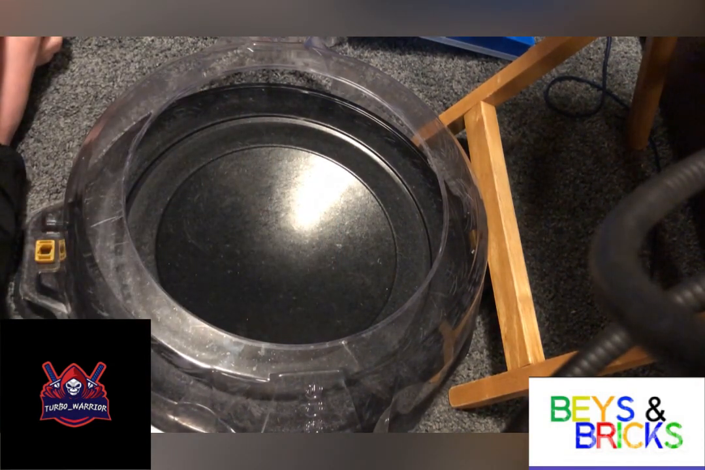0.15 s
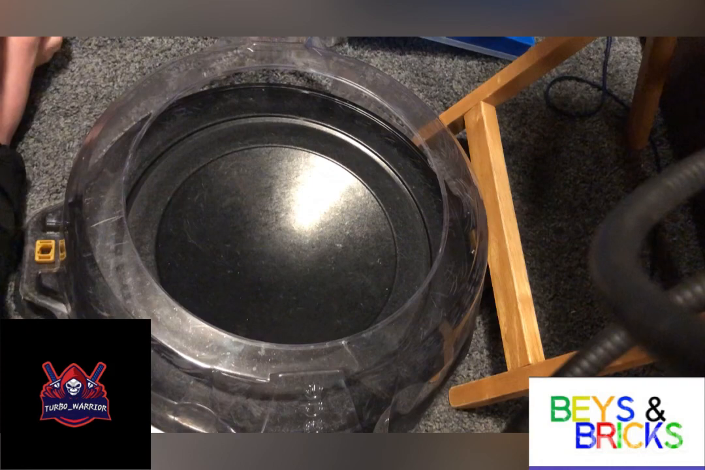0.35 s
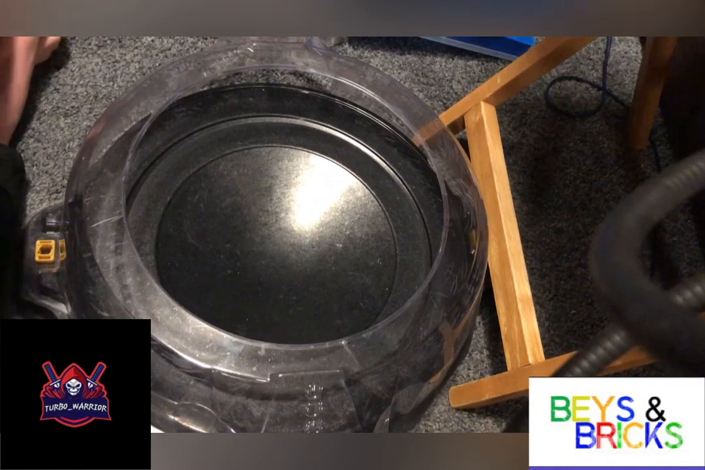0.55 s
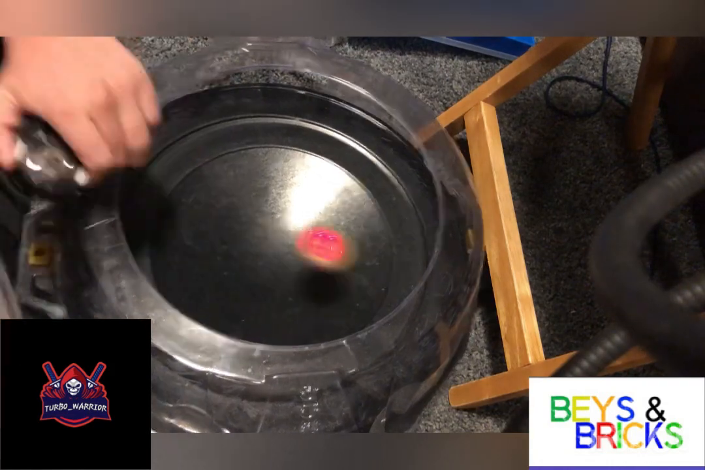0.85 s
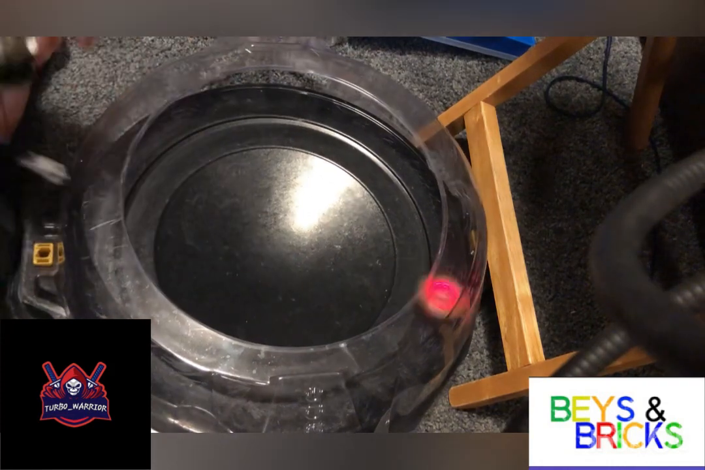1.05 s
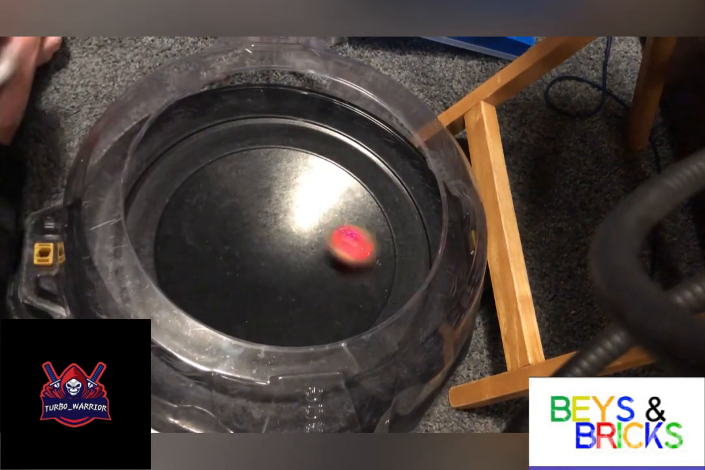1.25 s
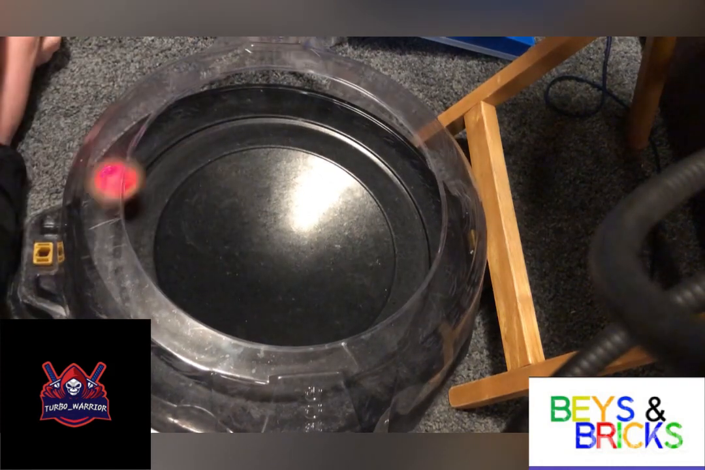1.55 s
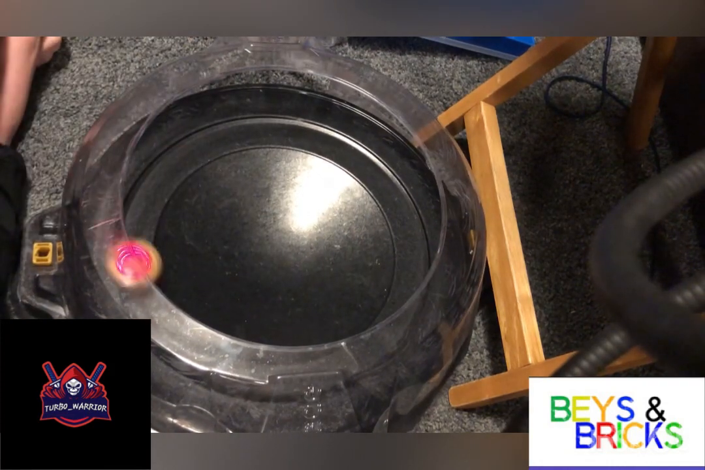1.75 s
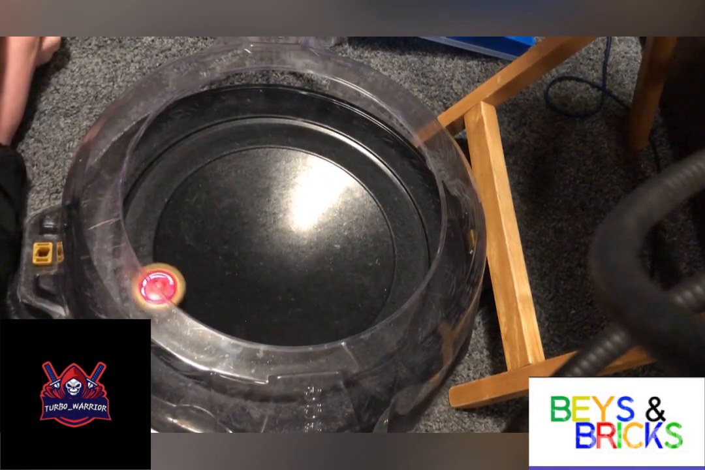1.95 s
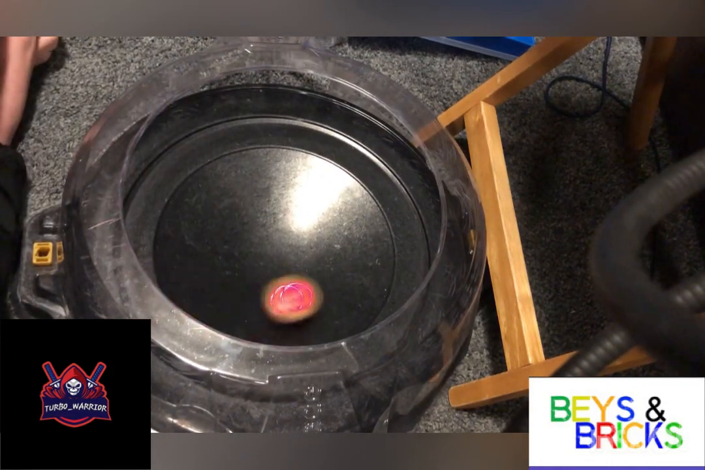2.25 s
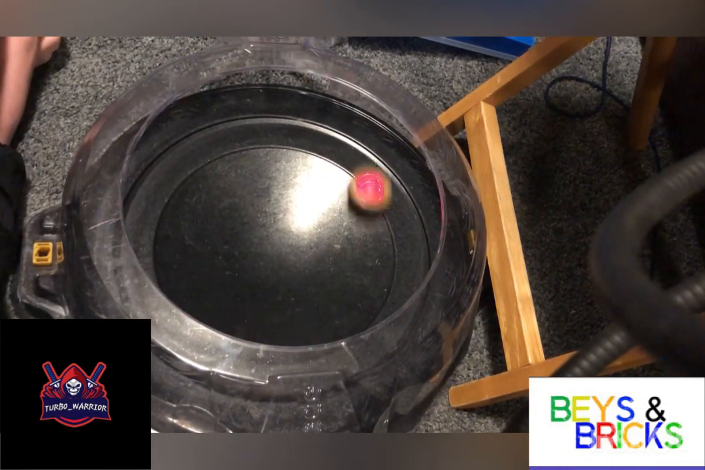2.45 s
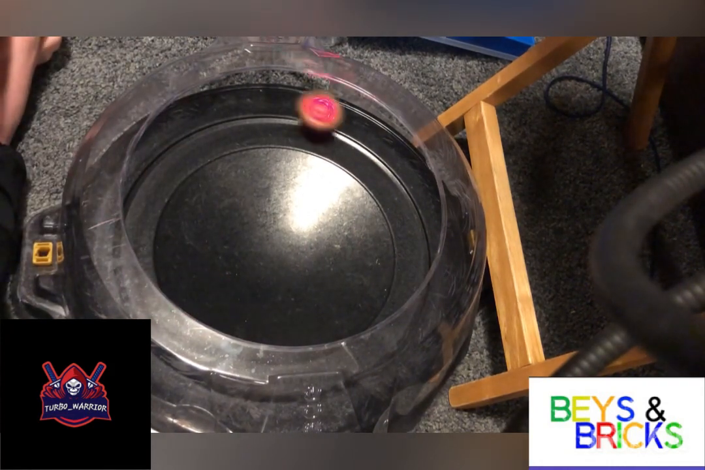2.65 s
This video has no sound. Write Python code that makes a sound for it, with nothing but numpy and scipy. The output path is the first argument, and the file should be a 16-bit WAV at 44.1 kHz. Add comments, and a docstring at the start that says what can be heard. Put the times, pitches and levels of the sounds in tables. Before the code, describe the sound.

A spinning top is launched into a plastic arena, close by in a small carpeted room. After faint handling clicks, the launcher squeaks and whirs from about 0.6 to 1 second. The top lands with a hard clack at 0.8 and strikes the wall loudly near 1.1 and 1.6 seconds. It circles with a quieter rumble, scrape, hum and rattle, knocking lightly around 2 and 2.6 seconds.

```python
"""A small carpeted room: a spinning top is ripped from a hand launcher into a plastic stadium, close by.
The launcher clicks, its gears whir with the cord, and stick-slip squeaks as the pull starts.
The top lands, bounces and knocks the wall, sending bending waves through the thin shell.
Its rim clacks, its tip rumbles and scrapes, imbalance hums at the spin rate and loose parts rattle.
The wall drones where the top rubs along it. The hardest blows clip."""
import sys
import numpy as np
from scipy import signal
from scipy.fft import rfft, irfft
from scipy.io import wavfile

SR = 44100
rng = np.random.default_rng(int(sys.argv[2]) if len(sys.argv) > 2 else 0)


def wrap_up_sound(samples):
    """Save the sound to the file named by the first command line argument, as 16-bit audio."""
    columns = np.atleast_2d(samples).T
    # keep every value between -1 and 1, then stretch to whole-number steps
    tamed = np.clip(columns, -1, 1)
    steps = np.round(tamed * 32767).astype(np.int16)
    wavfile.write(sys.argv[1], SR, steps)


N = 123479
TIME_S = np.arange(N) / SR

# room air: f/Hz, level/dB
AIR_SPECTRUM = [(15, -54.5), (25, -31.5), (123, -10), (200, -18.5), (775, -25), (16000, -41.5)]
# launcher handling clicks: t/s, level/dB
HANDLING_CLICKS = [(0.014, -37), (0.0224, -22), (0.071, -40.5), (0.105, -43), (.1235, -42.5), (0.5, -40.5),
                   (0.539, -39.5), (0.5708, -33), (0.61, -18), (.630, -15), (.736, -8.5)]
# launcher click: f/Hz, level/dB
LAUNCHER_SPECTRUM = [(100, -30), (500, -22.5), (1200, -7), (2200, -5), (4000, -1), (7000, -9.5),
                     (16000, -16.5)]
# launcher resonances: f/Hz, lift/dB
HOUSING_PEAKS = [(2050, 5), (3030, 5.5), (3560, 6)]
# cord pull and rewind: t/s, tooth rate/Hz, chatter level/dB
CORD_PULL = [(.555, 303.1, -52), (.604, 446.5, -33.5), (.622, 718.2, -19), (.638, 1079, -14),
             (.657, 1618, -10), (.668, 1875, -12.5), (.678, 1843, -7.5), (.692, 1407, -5),
             (.710, 1227, -7.5), (.720, 1137, -13), (.738, 1183, -5), (.746, 1162, -21.5),
             (.882, 1710, -31), (.898, 1840, -15), (.93, 1783, -20.5), (.965, 1468, -50)]
# gears: f/Hz, level/dB
GEAR_SPECTRUM = [(120, -59.5), (200, -33), (601, -15.5), (950, -6), (1700, -13.5), (2510, -2.5),
                 (3620, 2.5), (9930, -1), (16000, -5.5)]
# gear whine: multiple of tooth rate, level/dB
WHINE_HARMONICS = [(1, 1), (2, 1.5), (3, -5.5), (4, -12.5)]
# whine, strongest while the cord speeds the gears up: t/s, level/dB re chatter
WHINE_BALANCE = [(.67, -6.5), (.68, -12.5)]
# squeak: t/s, f/Hz, level/dB
SQUEAK_GLIDE = [(.593, 8690, -44), (.596, 8670, -14.5), (.602, 9410, -5), (.6045, 9610, -13.5),
                (.609, 9970, -8.5), (.613, 9940, 3.5), (.6165, 10100, -36)]

# rim clacks: t/s, level/dB, ring f/Hz
RIM_CLACKS = [(0.7777, -7.5, 6200), (1.019, -23.5, 5200), (1.170, -8.5, 5360), (1.299, -13.5, 3400),
              (1.303, -20, 2630), (1.9609, -22, 4000), (2.0533, -36.5, 3500), (2.1035, -28, 3940),
              (2.536, -26, 6900), (2.65, -28.5, 6650)]
# hard rim: f/Hz, level/dB
RIM_SPECTRUM = [(100, -51.5), (400, -15), (1200, -1.5), (3000, 0.5), (6000, -2.5), (9000, -3),
                (16000, -3.5)]
# blows on the stadium: t/s, thud/dB, knock/dB, crack/dB, struck spot f/Hz, body ring/dB
STADIUM_BLOWS = [(0.7778, 1.5, -16, -23, 271, -38), (.794, 0, -15.5, -17.5, 229, -40),
                 (0.973, -10, -18.5, -19, 314, -44), (1.055, -4, 0, -3.5, 1115, 0.5),
                 (1.139, -18.5, -37, -25, 365, -23), (1.177, -17, -37, -41, 346, -46),
                 (1.4734, -16, -28.5, -31, 558, -53), (1.523, -15.5, -12.5, -18, 598, -12.5),
                 (1.622, -22.5, -20.5, -23, 1060, -17), (1.6311, -12, -4, -4, 587, 6),
                 (1.651, -16, -10, -22.5, 571, -15), (2.499, -24.5, -26, -32.5, 577, -43),
                 (2.53, -23, -37, -32.5, 409, -50), (2.616, -21.5, -17, -17.5, 1213, -18.5)]
# centres of thud, knock, crack: f/Hz
BLOW_CENTRES_HZ = (287, 1470, 8000)
# dense shell modes: f/Hz, band level/dB
SHELL_SPECTRUM = [(30, -1), (70, -17.5), (140, -11), (290, -2), (550, 0), (1150, -1.5), (2200, -5.5),
                  (7000, -2), (16000, -2.5)]
# their early decay: f/Hz, t60/s
SHELL_DECAY = [(100, 0.044), (1000, 0.04), (10000, 0.034)]
# their tail: f/Hz, level/dB
SHELL_TAIL = [(100, -18.5), (1000, -14.5), (10000, -20)]
# main stadium modes: f/Hz, level/dB, t60/s
STADIUM_MODES = [(140, -8, .25), (231, -2, .22), (287, 0, .22), (314, -3, .22), (380, -5, .18),
                 (448, -6, .22), (580, -2, .22), (635, -6, .19), (786, -9, .17), (958, -10, .16),
                 (1114, -5, .17), (1556, -12, .13)]
# the top's body rings briefly at each blow: f/Hz, level/dB, t60/s
TOP_BODY_MODES = [(1927, -18.5, .06), (2063, -5.5, 0.028), (2191, -1, 0.028)]

# top running on the bowl: t/s, rumble/dB, scrape/dB, hum/dB
RUN_LEVELS = [(.79, -39, -29, -58), (.83, -19, -33, -36), (1.02, -49, -26, -41), (1.26, -33.5, -37.5, -62),
              (1.315, -32, -32.5, -28), (1.39, -32.5, -30.5, -29.5), (1.45, -29.5, -36.5, -32),
              (1.51, -57, -66, -45), (1.58, -51, -38, -52), (1.73, -25, -34, -38), (1.80, -39, -47, -41),
              (1.87, -53.5, -47.5, -53), (2.03, -43.5, -42, -63), (2.09, -32.5, -40.5, -37),
              (2.24, -39, -41, -41), (2.35, -38, -37, -32.5), (2.47, -32.5, -39, -34),
              (2.57, -40.5, -48, -41.5), (2.68, -30.5, -47, -48.5), (2.80, -52, -64, -45)]
# spin: t/s, rate/Hz
SPIN_RATE = [(.8, 97), (1.38, 93.5), (1.87, 83.4), (2.08, 83.5), (2.25, 85), (2.8, 80)]
# tip rumble: f/Hz, level/dB
RUMBLE_SPECTRUM = [(40, -46.5), (80, 7), (150, -4), (300, 5.5), (480, 3.5), (700, -4), (1150, -6.5),
                   (2200, -11.5), (4000, -123)]
# tip scrape: f/Hz, level/dB
SCRAPE_SPECTRUM = [(710, -29.5), (1200, -5.5), (1610, 0.5), (2450, -0.5), (5300, -3.5), (6870, -0.5),
                   (8000, -11.5), (12600, -10), (16000, -16)]
# resonances driven by the tip: f/Hz, lift/dB
TIP_PEAKS = [(1110, 0.5), (1570, 8), (4040, 9.5)]
# hum: multiple of spin rate, level/dB
HUM_ORDERS = [(1, 0), (1.5, 3.5), (2, 2.5), (2.5, -3), (3, -7), (4, -5.5), (5, -11), (6, -8.5), (7, -9),
              (13, -11)]
# lurch on every second turn: t/s, half-order gain/dB
LURCH = [(1.45, -3.5), (2.1, -12.5)]
# loose parts of the top: t/s, level/dB
RATTLE_CLICKS = [(1.331, -27.5), (1.352, -24), (1.3719, -21), (1.3948, -21.5), (1.425, -30.5),
                 (1.481, -27.5), (1.552, -29), (1.573, -31), (1.728, -30), (1.751, -31), (2.334, -31.5),
                 (2.346, -28), (2.357, -32), (2.37, -32), (2.3934, -28.5)]
# loose parts: f/Hz, level/dB
RATTLE_SPECTRUM = [(500, -8), (2500, -7), (5300, -14), (6900, 5), (8000, -6.5), (12000, -9), (16000, -14)]
# rides up the wall: closest contact t/s, length/s, level/dB, f/Hz
WALL_RIDES = [(1.715, 0.066, -31, 493), (2.069, 0.026, -29, 467), (2.492, 0.055, -29, 559),
              (2.648, 0.08, -29, 452)]


def amp(db):
    """Decibels to gain."""
    return 10 ** (np.asarray(db) / 20)


def unit(x):
    """Scale to rms 1."""
    return x / np.sqrt(np.mean(x ** 2) + 1e-20)


def at_hz(points, hz):
    """Read (f/Hz, value) points on a log axis."""
    points_hz, values = np.transpose(points)
    return np.interp(np.log(hz + 1), np.log(points_hz + 1), values)


def curves(table):
    """Interpolate each column of a (t/s, ...) table over the scene."""
    times_s, *columns = np.transpose(table)
    return [np.interp(TIME_S, times_s, column) for column in columns]


def during(table):
    """True between the first and last row."""
    return (TIME_S > table[0][0]) & (TIME_S < table[-1][0])


def colour(x, spectrum, peaks=(), q=37):
    """Filter x by a spectrum plus resonances; rms 1."""
    hz = np.fft.rfftfreq(len(x), 1 / SR)
    lift_db = sum(db / (1 + (q * (hz / peak_hz - 1)) ** 2) for peak_hz, db in peaks)
    return unit(irfft(rfft(x) * amp(at_hz(spectrum, hz) + lift_db), len(x)))


def noise_band(centre_hz, width_hz, size=N):
    """Bell-shaped noise band; rms 1."""
    hz = np.fft.rfftfreq(size, 1 / SR)
    bell = np.exp(-2 * ((hz - centre_hz) / width_hz) ** 2)
    return unit(irfft(rfft(rng.standard_normal(size)) * bell, size))


def wander(rate_hz):
    """Random drift up to about rate_hz; rms 1."""
    return noise_band(0, 2 * rate_hz)


def sine(cycles):
    """Sine with a random start phase."""
    return np.sin(2 * np.pi * (cycles + rng.random()))


def fade(t, t60_s):
    """Exponential decay."""
    return np.exp(-np.log(1000) * t / t60_s)


def place(events):
    """Mix (t/s, sound) pairs into one track."""
    out = np.zeros(N)
    for start_s, sound in events:
        part = out[round(start_s * SR):][:len(sound)]
        part += sound[:len(part)]
    return out


def air(level_db=-59):
    """Faint steady room noise, mostly bass."""
    return amp(level_db) * colour(rng.standard_normal(N), AIR_SPECTRUM)


def click(spectrum, ring_hz=None, peaks=(), rise_s=0.00031, size=6000):
    """A small hard part snaps: dense modes die fast and leave a faint tail."""
    t = np.arange(size) / SR
    body = colour(rng.standard_normal(size), spectrum, peaks)
    if ring_hz:
        body = unit(body + noise_band(ring_hz, 0.35 * ring_hz, size))
    tail = amp(-14) * fade(t, t60_s=0.1) * colour(rng.standard_normal(size), spectrum, peaks)
    return np.minimum(t / rise_s, 1) * (1.985 * fade(t, t60_s=0.02) * body + tail)


def handling():
    """The launcher housing clicks in the hand."""
    return place((s, amp(db) * click(LAUNCHER_SPECTRUM, peaks=HOUSING_PEAKS))
                 for s, db in HANDLING_CLICKS)


def gears(jitter=0.012, flutter_db=2.86):
    """Gear teeth chatter and whine at the tooth rate through pull and rewind."""
    tooth_hz, chatter_db = curves(CORD_PULL)
    whine_db = chatter_db + curves(WHINE_BALANCE)[0]
    teeth = np.cumsum(tooth_hz * (1 + jitter * wander(300))) / SR
    bursts = np.exp(-(teeth % 1)) * rng.standard_normal(N) * amp(flutter_db * wander(250))
    chatter = colour(bursts, GEAR_SPECTRUM, HOUSING_PEAKS)
    tones = sum(amp(db + at_hz(GEAR_SPECTRUM, k * tooth_hz)) * np.sin(2 * np.pi * k * teeth)
                for k, db in WHINE_HARMONICS)
    whine = unit(tones * (1 + 0.52 * wander(100)))
    return during(CORD_PULL) * (amp(chatter_db) * chatter + amp(whine_db) * whine)


def squeak():
    """Stick-slip as the pull starts: one high, rising tone."""
    hz, db = curves(SQUEAK_GLIDE)
    return np.sqrt(2) * amp(db) * np.sin(2 * np.pi * np.cumsum(hz) / SR) * during(SQUEAK_GLIDE)


def rim_clacks():
    """The top's hard rim strikes and rings briefly."""
    return place((s, amp(db) * click(RIM_SPECTRUM, ring_hz)) for s, db, ring_hz in RIM_CLACKS)


def blow(levels_db, spot_hz, body_db, contact_s=0.0016, size=16384):
    """Bending waves cross the thin shell, treble first; dense modes die fast, main modes ring on."""
    t = np.arange(size) / SR
    force = list(zip(BLOW_CENTRES_HZ, levels_db))

    def wave(hz, t60_s):
        """Bending-wave envelope: arrival, swell, decay."""
        slowness = np.sqrt(1000 / hz)  # re 1 kHz
        delay_s, rise_s = 0.0014 * slowness, contact_s + 0.00089 * slowness
        age_s = np.maximum(t - delay_s, 0)
        return amp(at_hz(force, hz)) * np.minimum(age_s / rise_s, 1) * fade(age_s, t60_s)

    out = np.zeros(size)
    for hz in np.geomspace(55, 14080, 17):
        early = wave(hz, at_hz(SHELL_DECAY, hz))
        tail = amp(at_hz(SHELL_TAIL, hz)) * wave(hz, t60_s=0.21)
        out += amp(at_hz(SHELL_SPECTRUM, hz) - 3) * (early + tail) * noise_band(hz, hz / 2, size)
    for hz, db, t60_s in STADIUM_MODES:
        out += amp(db - 10) * wave(hz, t60_s) * sine(hz * t)
    for hz, db, t60_s in TOP_BODY_MODES:
        out += amp(db + body_db) * np.minimum(t / contact_s, 1) * fade(t, t60_s) * sine(hz * t)
    struck_spot = amp(9) * wave(spot_hz, t60_s=0.031) * np.sin(2 * np.pi * spot_hz * t)
    return out + struck_spot


def stadium_blows():
    """The top lands, bounces and hits the wall."""
    return place((s, blow(levels_db, spot_hz, body_db))
                 for s, *levels_db, spot_hz, body_db in STADIUM_BLOWS)


def tip_scrape(pressure, grit_per_s=900, spread_db=3.5):
    """Random grit ticks plus resonant friction noise, both following tip pressure."""
    ticks = (rng.random(N) < grit_per_s / SR) * rng.choice([-1, 1], N)
    strength = amp(spread_db * np.minimum(rng.exponential(1, N), 4))
    grit = unit(signal.fftconvolve(ticks * strength * pressure, click(SCRAPE_SPECTRUM))[:N])
    friction = colour(rng.standard_normal(N) * pressure, SCRAPE_SPECTRUM, TIP_PEAKS)
    return 0.33 * grit + 0.49 * friction


def imbalance_hum(turns, waver=0.22):
    """Imbalance hums at spin orders; a lurch every second turn adds half orders."""
    lurch = amp(curves(LURCH)[0])
    hum = np.zeros(N)
    for order, db in HUM_ORDERS:
        gain = amp(db) * (lurch if order % 1 else 1)
        hum += gain * sine(order * turns) * (1 + waver * wander(4))
    return unit(hum)


def running_top(jitter=0.005, press_depth=0.3):
    """The humming top rumbles and scrapes over the bowl, its tip pressing once a turn."""
    rumble_db, scrape_db, hum_db = curves(RUN_LEVELS)
    spin_hz = curves(SPIN_RATE)[0] * (1 + jitter * wander(17))
    turns = np.cumsum(spin_hz) / SR
    pressure = 1 + press_depth * np.cos(2 * np.pi * turns)
    rumble = 0.71 * amp(rumble_db) * colour(rng.standard_normal(N) * pressure, RUMBLE_SPECTRUM)
    scrape = amp(scrape_db) * tip_scrape(pressure)
    hum = amp(hum_db) * imbalance_hum(turns)
    return (rumble + scrape + hum) * (TIME_S > RUN_LEVELS[0][0])


def rattles():
    """Loose parts click in the running top."""
    return place((s, amp(db) * click(RATTLE_SPECTRUM)) for s, db in RATTLE_CLICKS)


def wall_drone(width_hz=91):
    """The wall drones in a narrow band while the top rubs along it."""
    out = np.zeros(N)
    for centre_s, length_s, db, hz in WALL_RIDES:
        swell = np.exp(-2 * ((TIME_S - centre_s) / length_s) ** 2)
        out += amp(db) * swell * noise_band(hz, width_hz)
    return out


def room(x, level_db=-15, t60_s=0.24, delay_s=0.006, size=16000):
    """Faint, short reverberation of the carpeted room."""
    t = np.arange(size) / SR
    tail = rng.standard_normal(size) * fade(t, t60_s) * (t > delay_s)
    return amp(level_db) * signal.fftconvolve(x, tail / np.linalg.norm(tail))[:N]


def scene():
    """Launcher, top and stadium over room air; mono."""
    launcher = handling() + gears() + squeak()
    top = rim_clacks() + stadium_blows() + running_top() + rattles() + wall_drone()
    direct = launcher + top
    return (direct + room(direct) + air())[None]


def record(dry, drive_db=-0.5, low_cut_hz=69, band_limit_hz=16000):
    """Peak clipping, low cut, band limit."""
    clipped = np.clip(dry * amp(drive_db), -1, 1)
    hz = np.fft.rfftfreq(N, 1 / SR)
    thinned = irfft(rfft(clipped) * hz ** 2 / np.hypot(hz ** 2, low_cut_hz ** 2), N)
    lowpass = signal.firwin(255, band_limit_hz, window=("kaiser", 8), fs=SR)
    return signal.oaconvolve(thinned, lowpass[None], "same")


dry = scene()
out = record(dry)
wrap_up_sound(out)
```